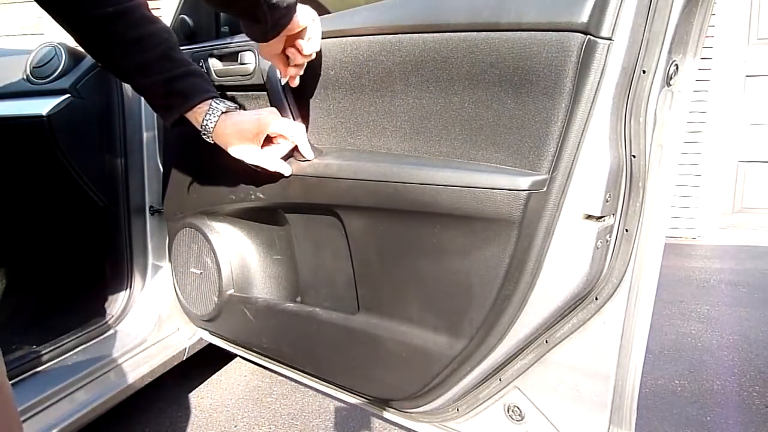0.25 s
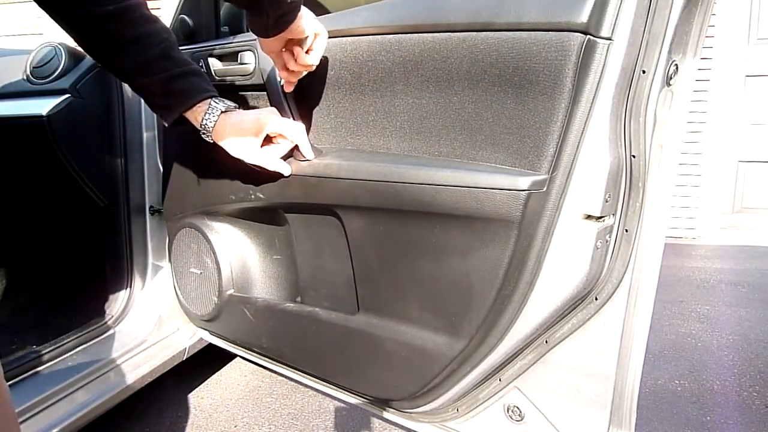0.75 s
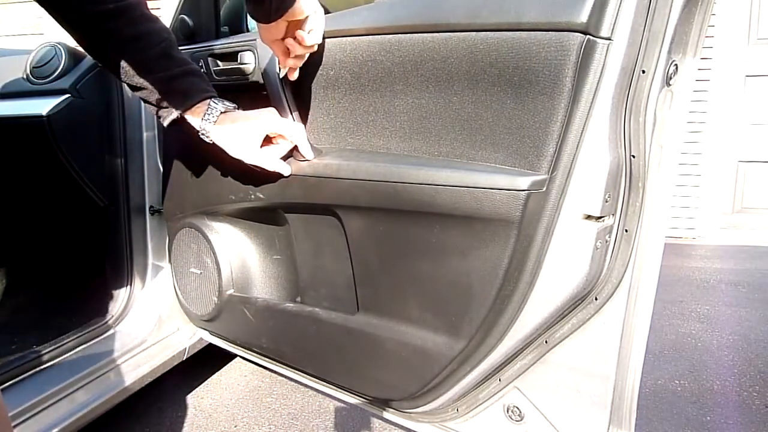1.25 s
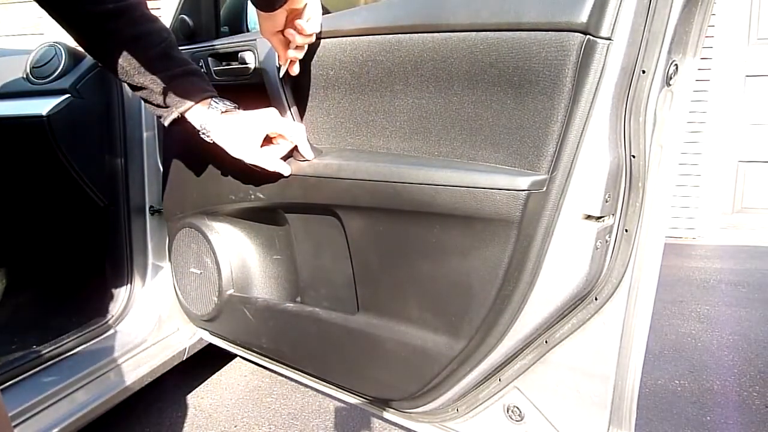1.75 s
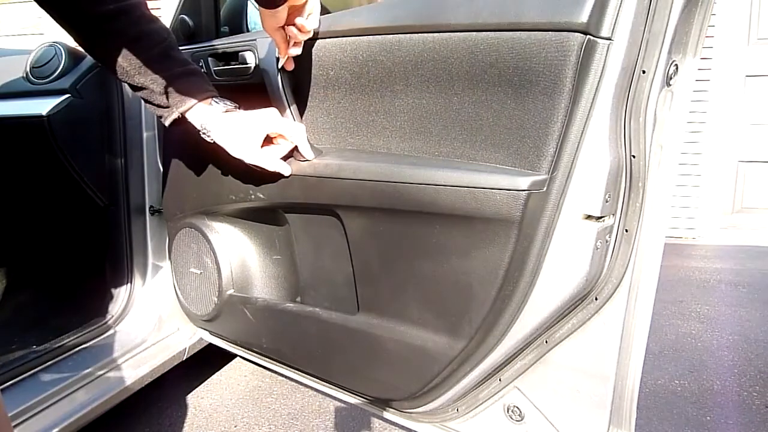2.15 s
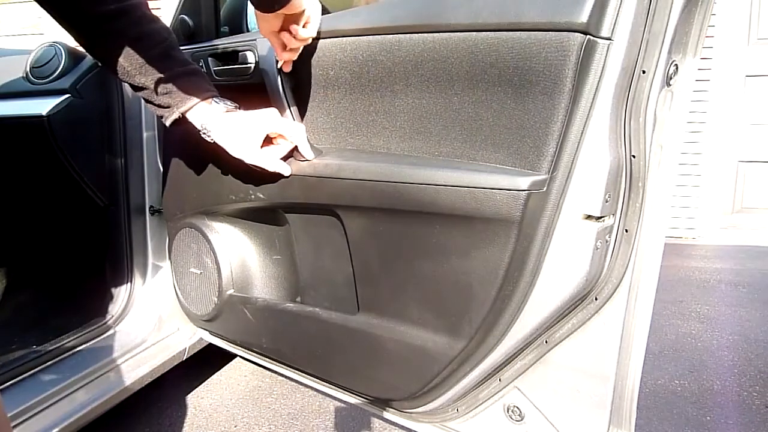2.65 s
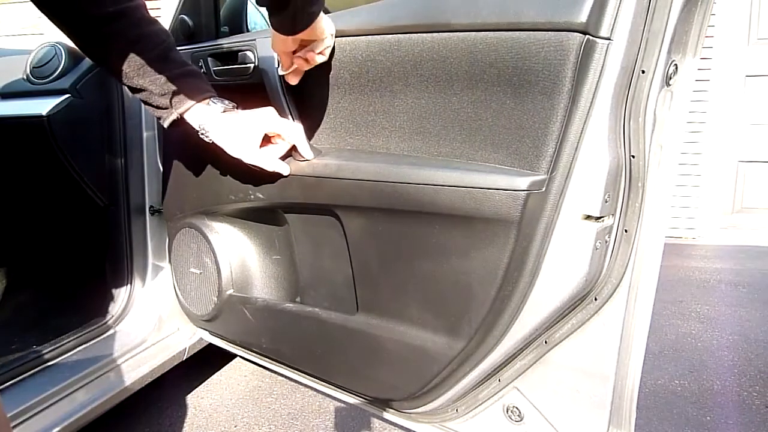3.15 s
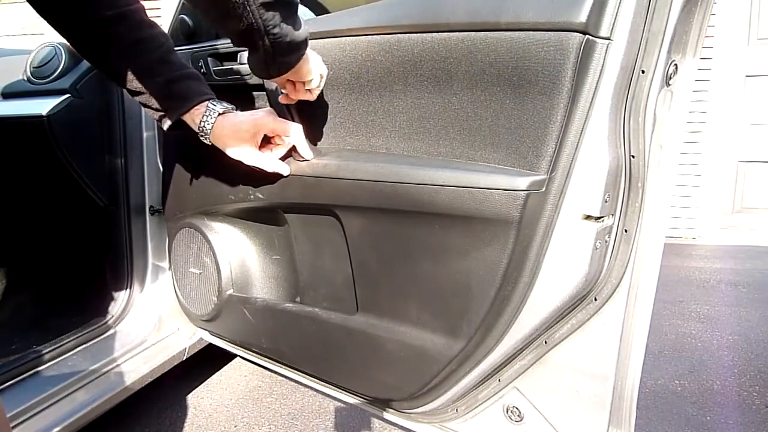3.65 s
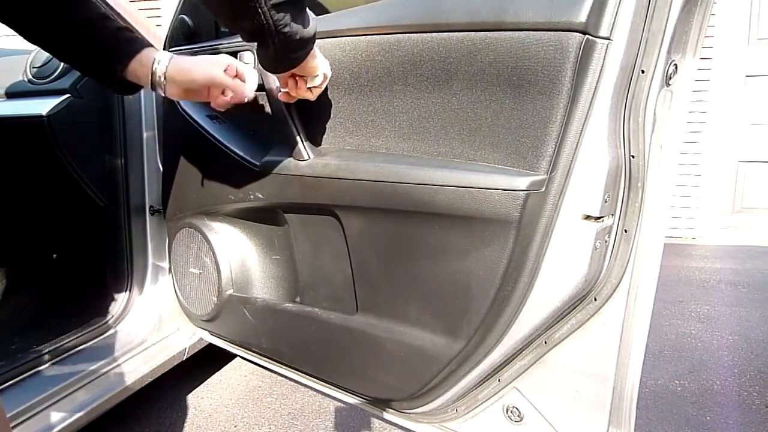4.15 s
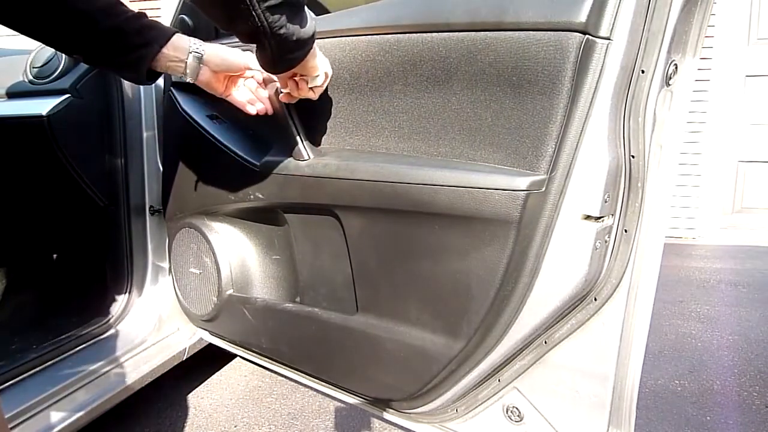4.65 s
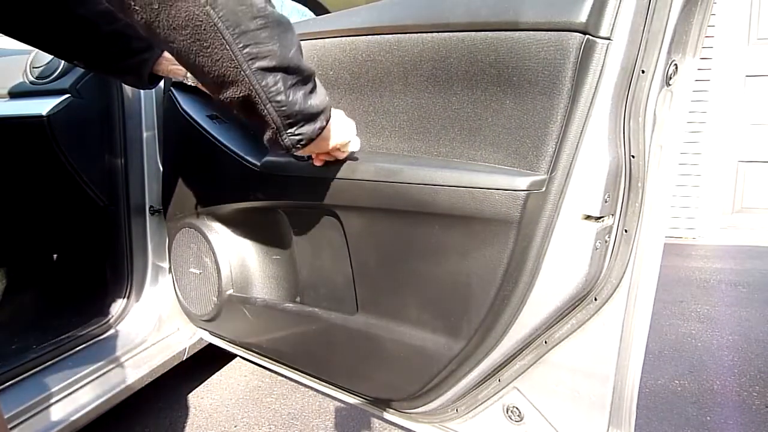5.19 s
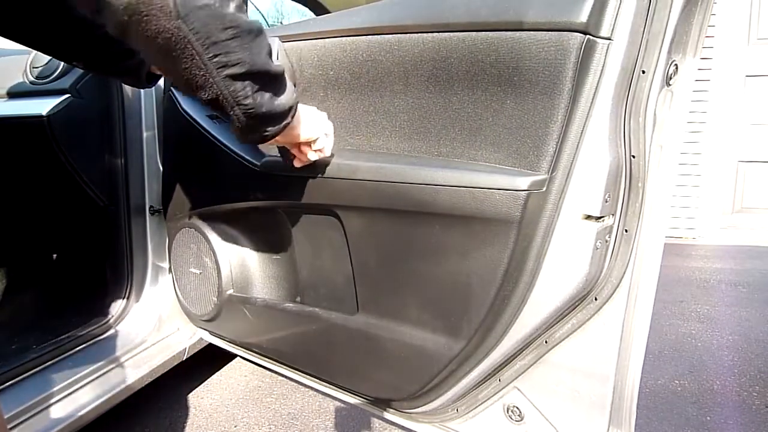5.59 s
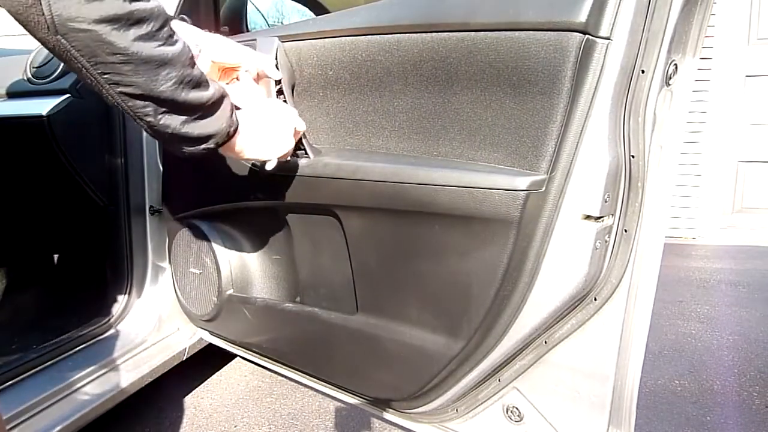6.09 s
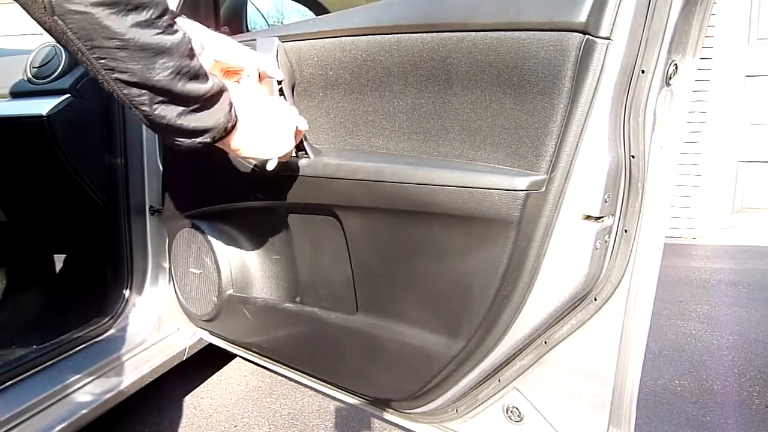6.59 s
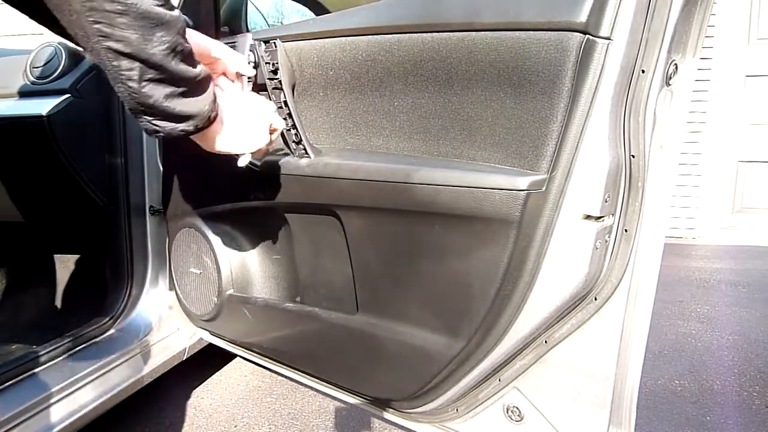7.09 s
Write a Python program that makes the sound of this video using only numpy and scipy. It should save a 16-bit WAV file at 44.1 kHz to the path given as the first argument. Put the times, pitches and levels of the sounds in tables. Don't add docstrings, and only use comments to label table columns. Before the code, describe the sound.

A tool taps and levers a hollow plastic car door panel, with gritty scrapes and nylon sleeve rustle, until clips snap loose in sharp bunches.

```python
import sys
import numpy as np
from scipy import signal
from scipy.fft import rfft, irfft, next_fast_len
from scipy.io import wavfile
from scipy.ndimage import uniform_filter1d

SR = 44100
rng = np.random.default_rng(int(sys.argv[2]) if len(sys.argv) > 2 else 0)


def transcribe(u):
    v = np.clip(np.atleast_2d(u).T, -1, 1)
    q = np.round(v * 32767).astype(np.int16)
    wavfile.write(sys.argv[1], SR, q)


def level_to_linear(level):
    exponent = np.asarray(level, float) / 20
    return 10 ** exponent


N = 323253

# (frequency [Hz], level [dB], t60 [s])
PANEL = [(156.8, -8.5, 0.35), (221.6, -8, 0.32), (271.2, 0, 0.42), (343, -25, 0.045), (400, 9.5, 0.11),
         (520, 2.5, 0.17), (660, 10.5, 0.069), (830, -35, 0.057), (950, -23, 0.099), (1050, -46, .06),
         (1350, -38, .06)]


def rms_one(x):
    return x / np.sqrt(np.mean(x ** 2) + 1e-20)


def peak_one(x):
    return x / (np.abs(x).max() + 1e-20)


def at_hz(points, hz):
    point_hz, value = np.transpose(points)
    return np.interp(np.log(hz + 1), np.log(point_hz), value)


def coloured(white, spectrum):
    size = next_fast_len(white.shape[-1])
    hz = np.arange(size // 2 + 1) * SR / size
    shaped = irfft(rfft(white, size) * level_to_linear(at_hz(spectrum, hz)), size)
    return rms_one(shaped[..., :white.shape[-1]])


def drift(rate):
    count = int(N / SR * rate) + 2
    return np.interp(np.linspace(0, count - 1, N), np.arange(count), rng.standard_normal(count))


def ring(clicks, hz, t60):
    r = level_to_linear(-60 / (max(t60, 0.002) * SR))
    w = 2 * np.pi * hz / SR
    return signal.lfilter([0, np.sin(w)], [1, -2 * r * np.cos(w), r * r], clicks + 1e-18)


def band(x, low_hz, high_hz):
    return signal.sosfilt(signal.butter(2, [low_hz, high_hz], "band", fs=SR, output="sos"), x)


def add(out, s, piece):
    at = round(s * SR)
    out[at:at + len(piece)] += piece[:N - at]


def blows():
    # (time [s], peak [dB], panel boom [dB rel], edge clack [dB rel])
    tap_blows = [(0.2455, -22, -5, -8), (0.2495, -22, 0, -10), (0.481, -29.5, -1, -8), (.679, -44, -23, 3),
                 (.872, -36.5, 0, 0), (.998, -36, -5, -6), (1.151, -46, -16, -14), (1.213, -39, 6, -5),
                 (1.234, -17, -9.5, -9.5), (1.851, -40, -7, 9), (1.886, -39, -2, -3),
                 (1.966, -32.5, 1.5, 0), (2.083, -36, 1, -17), (2.161, -41, -8, -11),
                 (2.367, -28, -4.5, -6), (2.407, -31, -3, -15), (2.658, -40.5, -8, 2),
                 (2.838, -29.5, -3, -2.5), (2.988, -42, -13, -12), (3.103, -39, -2, -17),
                 (3.239, -36, -4, -20), (3.65, -28, -2.5, -2), (3.962, -38.5, 1, -10), (3.997, -42, -16, 7),
                 (4.059, -44, -6, -12), (4.408, -43.5, 0, 9), (4.767, -24, -6, -27),
                 (4.936, -16.5, -1, -38), (5.029, -23.5, 5.5, -29), (5.088, -26.5, 9, -15)]
    # (time [s], peak [dB], ring [Hz], edge clack [dB rel])
    thud_blows = [(.079, -36, 440, -23), (.216, -35, 400, -11), (.259, -29, 464, -12),
                  (.3, -33.5, 345, -20), (1.263, -38, 420, -20), (1.275, -35, 420, -2),
                  (1.2817, -30.5, 560, -20), (1.2865, -33, 500, -20), (1.292, -36, 480, -20),
                  (1.298, -37, 520, -20), (1.995, -27.5, 437, -3), (2.003, -32.5, 440, -8),
                  (2.012, -32, 520, -2), (2.091, -40, 430, -20), (2.103, -40, 430, -20),
                  (2.115, -37.5, 240, -20), (2.135, -41, 250, -20), (2.191, -37.5, 427, -10),
                  (2.7155, -32, 480, -13), (2.722, -32.5, 452, -20), (2.934, -41, 544, -16),
                  (3.140, -34, 620, 2), (3.453, -29, 400, -31), (3.506, -35, 420, -21),
                  (3.514, -31, 420, -21), (3.524, -36, 420, -21), (3.547, -36, 517, -19),
                  (4.459, -33.5, 433, -20), (4.821, -37, 387, -21), (4.912, -36, 606, -11),
                  (4.953, -42, 500, -24), (5.15, -32, 486, -23), (5.208, -38, 473, -19),
                  (5.755, -35, 241, -9), (5.768, -39, 480, -15), (5.78, -38, 244, -20),
                  (5.79, -40, 423, -15), (6.366, -43, 465, -16), (6.593, -38, 386, -14),
                  (6.616, -30, 238, -16), (6.62, -32.5, 480, -16), (6.627, -31.5, 330, -24),
                  (6.907, -37, 504, -1)]
    # (time [s], peak [dB], ring [Hz], edge clack [dB rel])
    flex_blows = [
        (.272, -31, 400, -1),
        (1.246, -36, 580, -14),
        (2.697, -43.5, 400, 8),
        (3.124, -41, 700, 6),
        (3.160, -38.5, 487, -14),
        (4.726, -39.5, 400, 7.5),
        (4.8984, -26, 635, -20),
        (6.156, -40.5, 492, -15),
    ]
    # (time [s], peak [dB], ring [Hz], panel boom [dB rel], edge clack [dB rel])
    snap_blows = [
        (3.4234, -12.5, 716, -10, -18),
        (3.438, -13, 586, -5.5, -18),
        (5.282, -32.5, 414, 3, 2.5),
        (5.4057, -4, 1050, -10, -2),
        (5.41, -20, 660, -19, -14),
        (5.482, -18.5, 510, 3.5, 0.5),
        (5.486, -11.5, 400, -8, -4),
        (6.7628, -13.5, 1230, -11, 0),
        (6.7675, -10.5, 1590, -10, 1.5),
        (6.771, -12, 1900, -22, -6),
    ]
    # (time [s],
    # peak [dB], ring [Hz], ring t60 [s], edge clack [dB rel])
    rebound_blows = [(3.431, -24.5, 818, 0.049, 0.5), (3.4455, -26, 604, 0.016, -10),
                     (5.477, -24.5, 906, 0.028, 9), (5.49, -27, 132, 0.066, -30),
                     (5.407, -19, 215, 0.05, -20), (5.505, -26.5, 254, 0.1, -17),
                     (6.7675, -11, 1420, 0.037, -8), (6.7685, -13.5, 383, 0.034, -15),
                     (6.7676, -8.5, 1980, .018, -11), (6.783, -23, 560, 0.017, -10),
                     (6.773, -22, 250, .07, -20), (6.789, -30, 1490, 0.05, -10),
                     (5.4065, -14, 398, 0.031, -17), (5.4785, -19, 375, 0.019, -12),
                     (1.2345, -32.5, 1880, .012, -8), (.4815, -40, 1450, .012, -6),
                     (2.3675, -40, 1500, .012, -3), (3.42, -28, 1390, .03, -3)]

    tap_hz, tap_t60_s = 896, 0.019
    tap_damping = 0.28
    thud_cycles, thud_boom_db = 9.2, -4
    flex_cycles, flex_boom_db = 15, 6
    snap_t60_s, rebound_boom_db = 0.0054, -10
    rows = []
    for s, db, boom, clack in tap_blows:
        rows.append((s, db, tap_hz, tap_t60_s * level_to_linear(-tap_damping * (db + 29.5)), boom, clack))
    for s, db, hz, clack in thud_blows:
        rows.append((s, db, hz, thud_cycles / hz, thud_boom_db, clack))
    for s, db, hz, clack in flex_blows:
        rows.append((s, db, hz, flex_cycles / hz, flex_boom_db, clack))
    for s, db, hz, boom, clack in snap_blows:
        rows.append((s, db, hz, snap_t60_s, boom, clack))
    for s, db, hz, t60, clack in rebound_blows:
        rows.append((s, db, hz, t60, rebound_boom_db, clack))
    return rows


def knock(hz, t60, boom_db, clack_db):
    t = np.arange(SR // 4) / SR
    noise = rng.standard_normal(len(t))
    contact = np.sin(np.pi * np.minimum(t * hz * 1.88, 1)) ** 2

    spot = peak_one(ring(ring(contact, hz * 1.005, t60), hz * 1.108, t60))
    blunt_push = peak_one(ring(contact, hz * 1.51, 4 / hz))
    spot = peak_one(spot + 0.5 * blunt_push)

    spread_db = rng.normal(0, 2.5, len(PANEL))
    modes = sum(level_to_linear(g + d) * ring(contact, f, decay) for (f, g, decay), d in zip(PANEL, spread_db))
    shudder = band(noise[::-1] * np.minimum(t / 0.0015, 1) * level_to_linear(-60 * t / 0.083), 212, 770)
    drone = band(noise * np.minimum(t / 0.03, 1) * level_to_linear(-60 * t / 0.27), 186, 530)
    panel = peak_one(peak_one(modes) + 2.0 * peak_one(shudder) + 0.31 * peak_one(drone))

    clack = peak_one(band(noise * level_to_linear(-60 * t / 0.024), 860, 2040))
    return spot + level_to_linear(boom_db) * panel + level_to_linear(clack_db) * clack


def knocks():
    out = np.zeros(N)
    for s, db, hz, t60, boom_db, clack_db in blows():
        add(out, s, level_to_linear(db) * knock(hz, t60, boom_db, clack_db))
    return signal.sosfilt(signal.butter(3, 140, "highpass", fs=SR, output="sos"), out)


def ticks():
    # (time [s], peak [dB], ring [Hz], crack [dB rel])
    tip_ticks = [(0.2265, -38, 3050, 2), (.2465, -34, 5700, -2), (.2712, -29, 5600, 0.5),
                 (0.3015, -37, 4670, -2), (0.4357, -45, 3170, 6), (1.216, -31.5, 4960, -13),
                 (1.8491, -37.5, 3000, -4), (1.9663, -44, 4860, -3), (1.9926, -36.5, 5330, 3),
                 (2.367, -41, 3740, -5), (2.6585, -46, 5700, -6), (2.678, -47, 6000, 3),
                 (2.8368, -43, 3030, -5), (3.1287, -41, 5590, 5), (3.1564, -43, 3570, 8),
                 (3.649, -37, 3000, -12), (3.851, -42, 3500, -10), (3.9972, -40, 3650, 1),
                 (4.726, -36, 3420, 5), (4.766, -29.5, 6000, -4), (4.801, -43, 5730, -9),
                 (5.2125, -41, 5370, 2), (5.282, -32, 3070, 2), (5.5721, -41, 5100, -3),
                 (1.28, -43, 6000, 8), (5.985, -42, 5400, -3), (6.9098, -49, 3300, 9)]
    # (time [s], peak [dB], ring [Hz], crack [dB rel], crack t60 [s])
    clip_cracks = [(2.7134, -32, 5000, 3, .005), (3.4076, -19, 5600, 6, 0.0043),
                   (3.4357, -18, 4540, -3, .006), (4.9356, -22, 6100, -12, .012),
                   (5.0292, -24, 3240, 2, .012), (5.088, -25, 4400, 0, .012),
                   (5.4056, -20.5, 5100, 13.5, 0.016), (5.4783, -19.5, 3180, 8, 0.014),
                   (5.484, -8.5, 3650, -14, 0.015), (5.605, -40, 6000, 14, 0.01),
                   (6.7630, -4, 5930, -9, 0.0051), (6.7673, -9, 7300, 6, .013),
                   (6.768, -10, 5360, -20, .012)]
    tick_t60_s = 0.024
    out, t = np.zeros(N), np.arange(SR // 12) / SR
    for s, db, hz, crack_db, t60 in [(*row, tick_t60_s) for row in tip_ticks] + clip_cracks:
        hard_edge = 2.85 * (t == 0)
        burst = (rng.standard_normal(len(t)) + hard_edge) * level_to_linear(-60 * t / max(t60, 0.002))
        clip_ring = peak_one(ring(burst, hz, 0.0044))
        crack = peak_one(band(burst, 950, 10000))
        add(out, s, level_to_linear(db - 3.0) * (clip_ring + level_to_linear(crack_db) * crack))
    return out


def squeal(grains, hz, cycles):
    r = level_to_linear(-60 * hz.mean() / (cycles * SR))
    phase = 2 * np.pi * np.cumsum(hz) / SR
    smooth = signal.lfilter([1], [1, -r], grains * np.exp(-1j * phase))
    return rms_one(np.real(smooth * np.exp(1j * phase)))


def strokes(grains):
    # (frequency [Hz], density [dB per Hz])
    scrape_colour = [(1200, 2.5), (2500, -4), (3500, 1.5), (4000, -0.5), (4600, 1), (5700, 2), (6900, 1.5),
                     (7900, -3.5), (9000, -3), (10300, -3), (11700, -5.5), (13000, -11), (15500, -20),
                     (16500, -21)]
    # (start [s], end [s], mean level [dB], squeak [Hz], panel rumble [dB rel])
    skid_strokes = [
        (3.988, 4.007, -52.5, 4780, 7),
        (4.758, 4.872, -56.5, 5900, 11),
        (4.876, 4.897, -36, 10500, -18),
        (5.008, 5.029, -37.5, 10000, -27),
        (5.213, 5.312, -57, 5400, 10.5),
    ]
    # (start [s], end [s], mean level [dB], squeak [Hz], panel rumble [dB rel])
    drag_strokes = [(.236, .268, -47, 5700, 9), (.802, .928, -62, 3670, 13.5), (.96, 1.077, -63, 4900, 4),
                    (1.998, 2.044, -53, 9550, 5.5), (2.693, 2.716, -61, 5000, 12),
                    (3.116, 3.152, -49.5, 5750, 8), (3.409, 3.426, -28, 10000, -14),
                    (4.795, 4.845, -64, 8600, 0), (4.903, 4.936, -41, 5300, 2),
                    (4.95, 5.008, -53, 9600, 12.5), (5.035, 5.062, -52, 9700, -5),
                    (5.062, 5.092, -38.5, 6350, -22), (5.1, 5.15, -52, 6600, 12),
                    (5.145, 5.168, -51.5, 6400, 8)]
    # (start [s], end [s], mean level [dB], squeak [Hz], panel rumble [dB rel])
    slip_strokes = [
        (3.152, 3.185, -63.5, 5000, 18),
        (3.424, 3.447, -33.5, 5670, 2),
        (3.50, 3.577, -59.5, 2840, 13),
        (4.936, 4.955, -55, 5500, 0),
        (5.476, 5.489, -30.5, 7760, 10.5),
        (5.494, 5.515, -52, 3600, -1),
        (5.75, 5.805, -69, 3300, 21),
        (6.588, 6.64, -67, 6004, 16.5),
    ]
    bite_s, lift_s = 0.0052, 0.0067
    squeak_wander, squeak_rise_per_db = 0.015, 0.008
    hiss = coloured(grains, scrape_colour)
    modes = sum(level_to_linear(g) * ring(grains, f, decay * 0.078) for f, g, decay in PANEL)
    rumble = rms_one(band(modes, 290, 1450))
    out, stutter = np.zeros(N), level_to_linear(1.5 * drift(600))
    wander = squeak_wander * drift(40)
    kinds = ((skid_strokes, 6.5), (drag_strokes, 0), (slip_strokes, -8))
    rows = [(*row, swell_db) for kind, swell_db in kinds for row in kind]
    for start, end, db, hz, panel_db, swell_db in rows:
        span = slice(round(start * SR), round(end * SR) + 200)
        t = np.arange(span.stop - span.start) / SR
        pressure_db = swell_db * np.linspace(-0.5, 0.5, len(t))
        fade = np.clip(np.minimum(t / bite_s, (t[-1] - t) / lift_s), 0, 1)

        pitch = hz * (1 + wander[span] + squeak_rise_per_db * pressure_db)
        partner = pitch * (1.5 if hz < 8000 else 1 / 1.44)
        squeak = squeal(grains[span], pitch, cycles=26.0)
        squeak = squeak + level_to_linear(-9.5) * squeal(grains[span], partner, cycles=39.0)

        lag = SR / hz * np.linspace(1.9, 2.2, len(t))
        echo = np.interp(np.arange(span.start, span.stop) - lag, np.arange(N), hiss)
        combed = hiss[span] + 0.069 * echo
        stroke = combed + level_to_linear(-7.0) * squeak + level_to_linear(panel_db) * rumble[span]
        add(out, start, fade * level_to_linear(db + pressure_db) * stutter[span] * stroke)
    return out


def squeals(grains):
    # (start [s], end [s], level [dB], from [Hz], to [Hz])
    squeal_glides = [(3.411, 3.422, -40, 13500, 13000), (3.413, 3.423, -35, 8500, 8800),
                     (3.426, 3.438, -36, 5300, 5900), (4.768, 4.88, -62, 5800, 6000),
                     (4.88, 4.9, -40, 8310, 8600), (4.882, 4.9, -44, 5300, 5000),
                     (4.905, 4.935, -44, 4594, 5400), (4.91, 4.92, -45, 8700, 8300),
                     (4.965, 5.0, -57, 5600, 5600), (5.017, 5.03, -45, 5000, 6200),
                     (5.065, 5.09, -39, 4670, 4180), (5.064, 5.08, -42, 6300, 6400),
                     (5.078, 5.087, -50, 10400, 10000), (5.103, 5.135, -54, 4200, 4100),
                     (5.105, 5.165, -59, 8600, 8700), (1.21, 1.225, -55, 5000, 4950),
                     (.234, .257, -48, 5700, 5750), (.238, .256, -50, 3000, 3100),
                     (.24, .255, -52, 11500, 11500), (5.494, 5.503, -42, 3500, 3900)]
    out = np.zeros(N)
    for start, end, db, from_hz, to_hz in squeal_glides:
        span = slice(round(start * SR), round(end * SR))
        count = span.stop - span.start
        tone = squeal(grains[span], np.linspace(from_hz, to_hz, count), cycles=54)
        add(out, start, level_to_linear(db) * np.hanning(count) ** 0.5 * tone)
    return out


def scrapes():
    hits = rng.random(N) < 16000 / SR
    strength = level_to_linear(2.0 * np.minimum(rng.exponential(1, N), 4))
    grains = hits * strength * rng.choice([-1, 1], N)
    return strokes(grains) + squeals(grains)


def sleeve():
    # (frequency [Hz], density [dB per Hz])
    rustle_colour = [(1500, -13), (2800, 2), (3200, -3), (3600, 4), (4200, -8), (4830, 3), (5700, -1),
                     (6600, 0.5), (8300, -3), (9300, -2), (10600, -1.5), (12500, -5.5), (14700, -9),
                     (16500, -3)]
    # (start [s], end [s], start level [dB], end level [dB])
    sleeve_moves = [(0, .1, -54, -73), (0.84, 1.122, -55, -58), (1.124, 1.573, -56.5, -61.5),
                    (2.1, 2.298, -71, -60), (2.802, 3.0, -68, -66), (4.04, 4.25, -74, -71),
                    (5.662, 5.78, -61, -59), (5.968, 6.303, -53.5, -52), (6.303, 6.424, -58, -61),
                    (6.41, 6.638, -55, -56.5), (6.85, 7.088, -68, -61), (7.07, 7.4, -59.5, -48)]
    # (start [s], end [s],
    # from [Hz], to [Hz], level [dB])
    thin_lines = [(0.834, .94, 3600, 3650, -56), (0.833, 0.93, 2810, 2780, -54.5),
                  (1.307, 1.43, 4900, 4900, -60), (1.362, 1.5, 3180, 2700, -62),
                  (2.84, 2.93, 10800, 11500, -69), (7.075, 7.17, 13300, 15200, -63),
                  (7.11, 7.215, 13600, 15500, -59), (7.22, 7.33, 12800, 14300, -65),
                  (7.26, 7.33, 9700, 10400, -63), (7.24, 7.33, 11900, 12500, -66),
                  (7.25, 7.33, 14700, 15500, -66), (7.06, 7.1, 7500, 7600, -64),
                  (7.15, 7.22, 10900, 11500, -70), (7.2, 7.29, 8600, 9400, -62)]
    swish = np.zeros(N)
    for start, end, start_db, end_db in sleeve_moves:
        t = np.arange(round((end - start + 0.013) * SR)) / SR
        fade = np.minimum(np.minimum(t, t[-1] - t) / 0.017, 1)
        add(swish, start, fade * level_to_linear(np.linspace(start_db, end_db, len(t))))
    out = swish * level_to_linear(1.7 * drift(25)) * coloured(rng.standard_normal(N), rustle_colour)
    for start, end, from_hz, to_hz, db in thin_lines:
        count = round((end - start) * SR)
        wobble = signal.lfilter([1], [1, -0.988], rng.standard_normal(count))
        carrier = np.sin(2 * np.pi * np.cumsum(np.linspace(from_hz, to_hz, count)) / SR)
        add(out, start, level_to_linear(db) * np.hanning(count) ** 0.5 * rms_one(wobble * carrier))
    return out


def cabin(x):
    t = np.arange(SR // 6) / SR
    dull, bright, edge = rng.standard_normal((3, 2, len(t)))
    tail = band(dull, 690, 5700) * level_to_linear(-60 * t / 0.14)
    tail = tail + 3.3 * band(bright, 2400, 8700) * level_to_linear(-60 * t / 0.066)
    tail = tail * np.minimum(t / 0.00038, 1) / np.sqrt(np.sum(tail ** 2) / 2)

    edge = edge[0] * [[1], [-1]]
    housing = band(edge * level_to_linear(-60 * t / 0.018), 4400, 18000)
    housing = housing / np.sqrt(np.sum(housing ** 2) / 2)
    scatter = level_to_linear(-14) * tail + level_to_linear(-10.0) * housing
    return signal.fftconvolve(x[None], scatter, axes=1)[:, :N]


def traffic():
    # (frequency [Hz], density [dB per Hz])
    traffic_colour = [(12, -47), (30, -16), (75, -5), (135, -7), (189, -9.5), (224, -1.5), (258, -8.5),
                      (305, -5), (393, -9.5), (428, -7.5), (839, -7), (2890, -18.5), (9950, -31.5),
                      (15200, -36.5), (16500, -57)]
    # (frequency [Hz], correlation [-1..1])
    port_likeness = [(60, 0.95), (180, 0.9), (550, 0.78), (1650, 0.52), (4970, -0.58), (15000, -0.39)]
    level_db, lag_s = -44.5, 4e-5
    size = next_fast_len(N)
    hz = np.arange(size // 2 + 1) * SR / size
    alike = np.clip(at_hz(port_likeness, hz), 0, 1)
    mid, side = rfft(rng.standard_normal((2, size))) * level_to_linear(at_hz(traffic_colour, hz))
    both = np.sqrt(1 + alike) * mid + np.sqrt(1 - alike) * side * [[1], [-1]]
    hum = irfft(both, size)[:, :N]
    hum[0] = np.roll(hum[0], round(lag_s * SR))
    return level_to_linear(level_db + 0.6 * drift(8)) * rms_one(hum)


def far_whine():
    # (time [s], level [dB])
    whine_level = [
        (0, -77),
        (4.9, -85),
        (5.8, -57.5),
        (6.53, -69),
        (7.33, -64),
    ]
    t = np.arange(N) / SR
    level_db = np.interp(t, *np.transpose(whine_level)) + 1.5 * drift(16)
    return level_to_linear(level_db) * np.sin(2 * np.pi * 2035 * t + 0.97 * drift(17))


def scene():
    door = knocks() + ticks() + scrapes() + sleeve()
    lean = 0.19 * band(door, 740, 22000) + 0.05 * np.diff(door, prepend=0)
    near = door * level_to_linear([[-0.3], [0.3]]) + lean * [[1], [-1]]
    return near + cabin(door) + traffic() + far_whine()


def roll_off(x):
    return signal.sosfilt(signal.butter(12, 16850, fs=SR, output="sos"), x)


def record(dry):
    top_band_hz, edge_hz = 15600, 250
    size = next_fast_len(N)
    hz = np.arange(size // 2 + 1) * SR / size
    treble = irfft(rfft(dry, size) * np.clip((hz - top_band_hz) / edge_hz, 0, 1), size)[:, :N]
    power = np.mean(treble ** 2, axis=0)
    sudden = uniform_filter1d(power, size=384) > 11 * uniform_filter1d(power, size=6000)
    keep = uniform_filter1d(1.0 * sudden, size=256)
    mix = np.clip(dry - treble * (1 - keep), -1, 1)
    return roll_off(mix)


dry = scene()
out = record(dry)
transcribe(out)
```